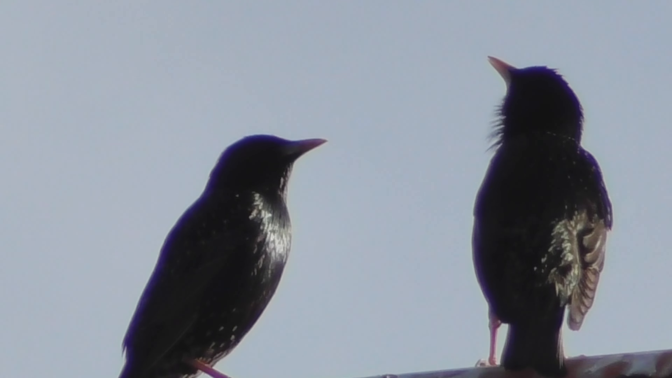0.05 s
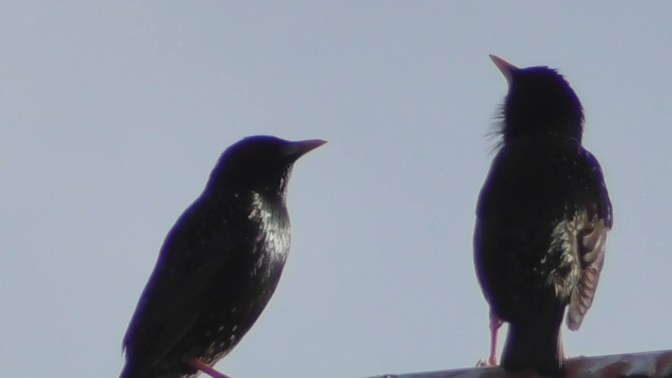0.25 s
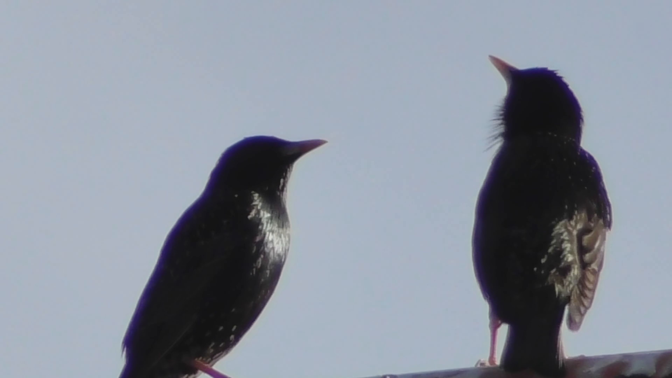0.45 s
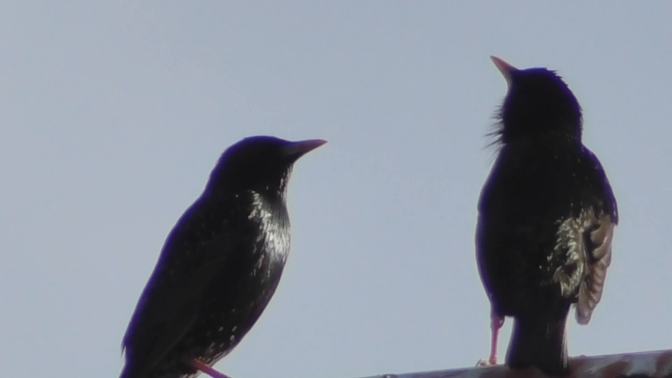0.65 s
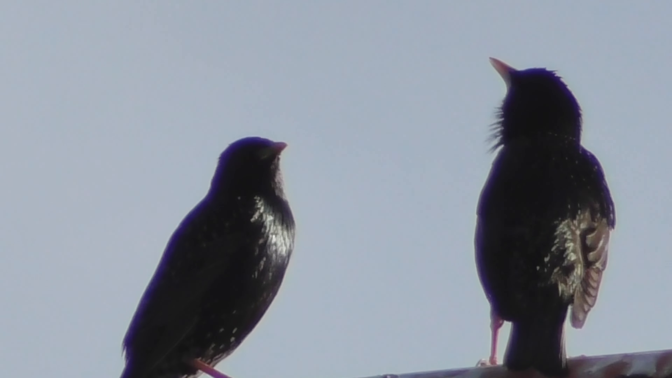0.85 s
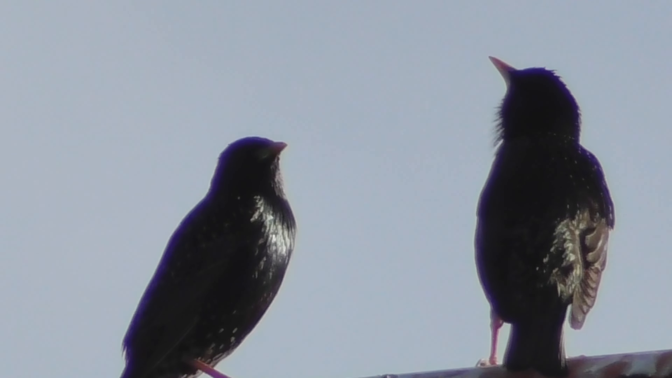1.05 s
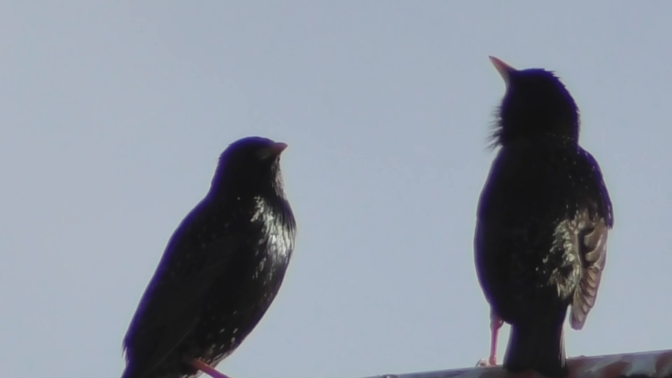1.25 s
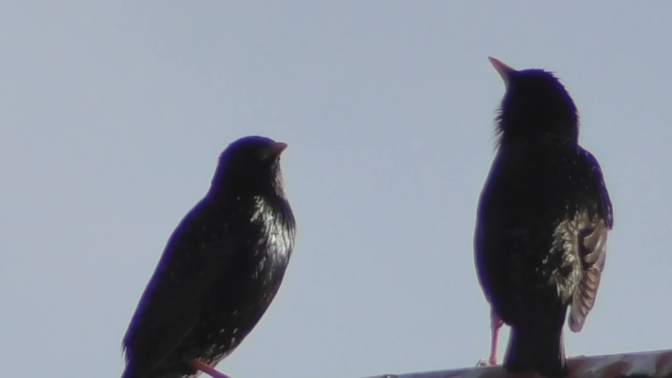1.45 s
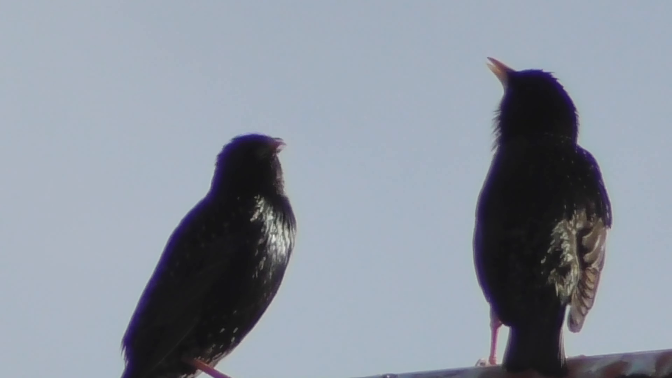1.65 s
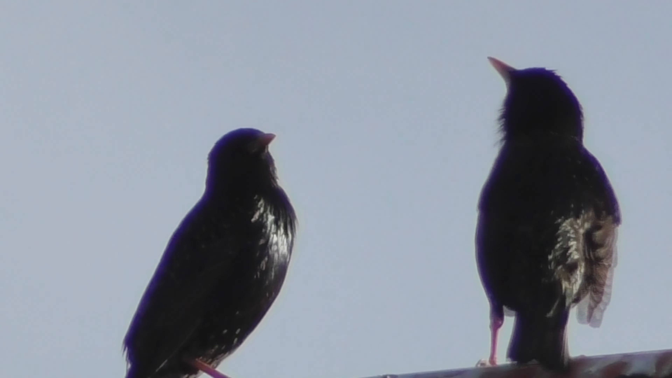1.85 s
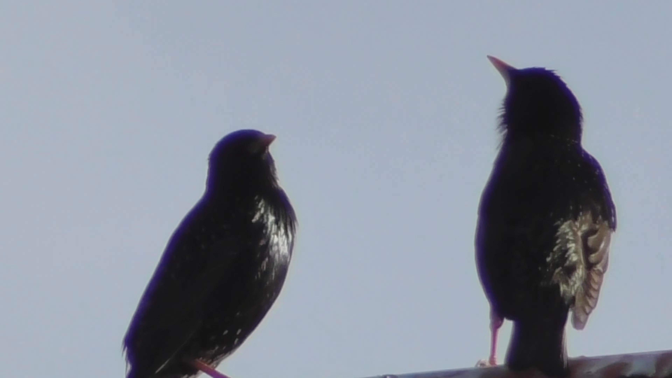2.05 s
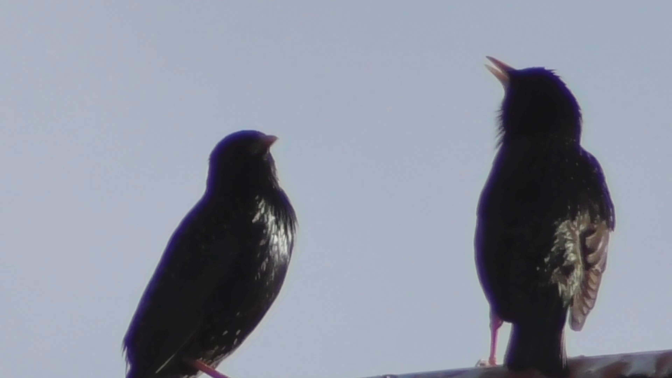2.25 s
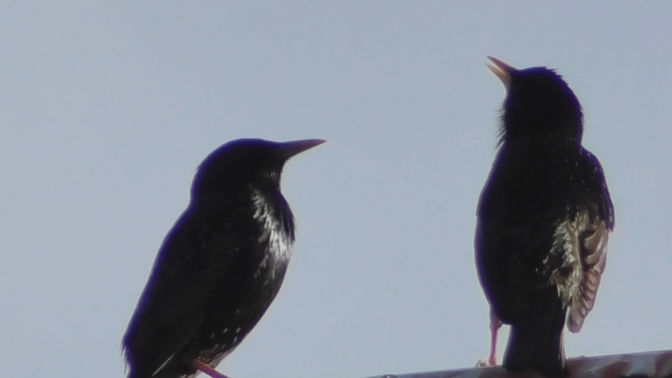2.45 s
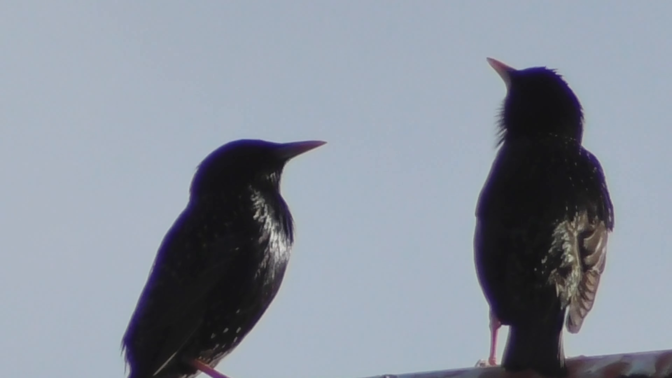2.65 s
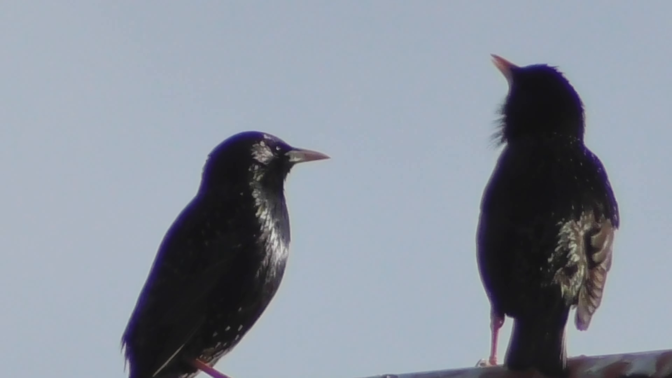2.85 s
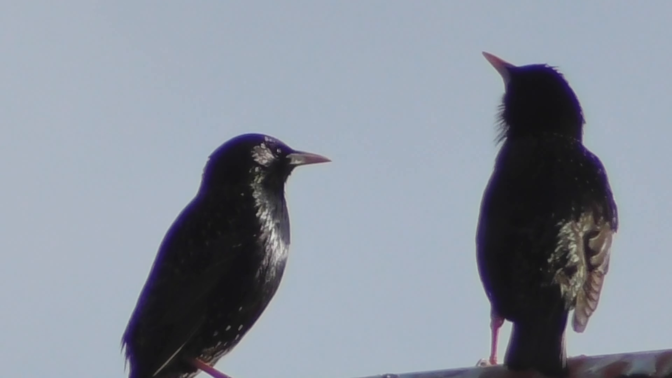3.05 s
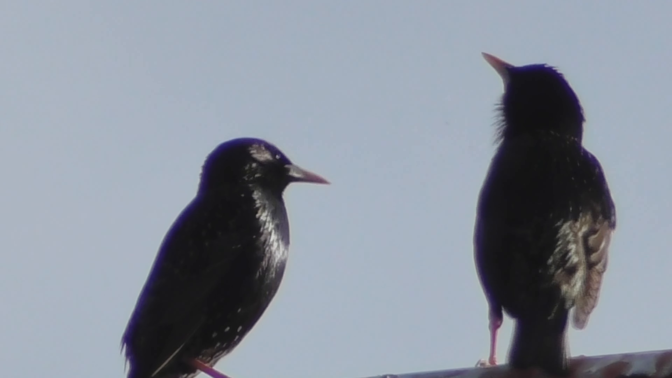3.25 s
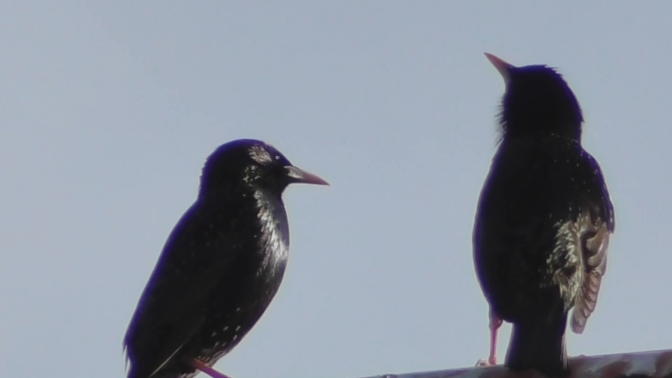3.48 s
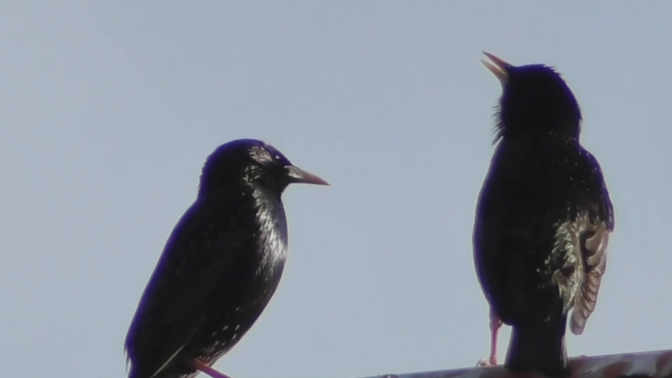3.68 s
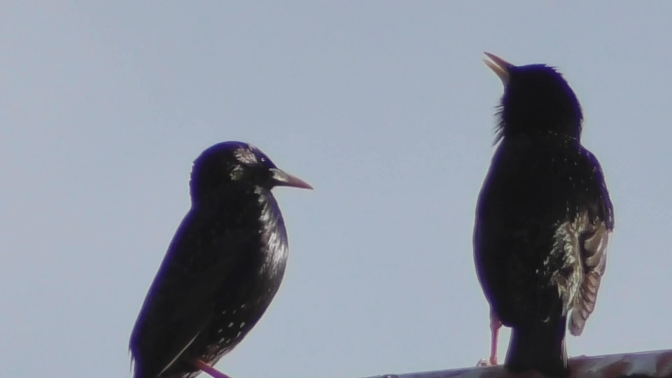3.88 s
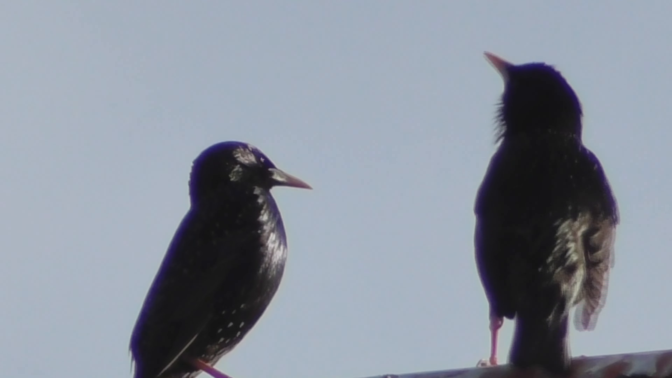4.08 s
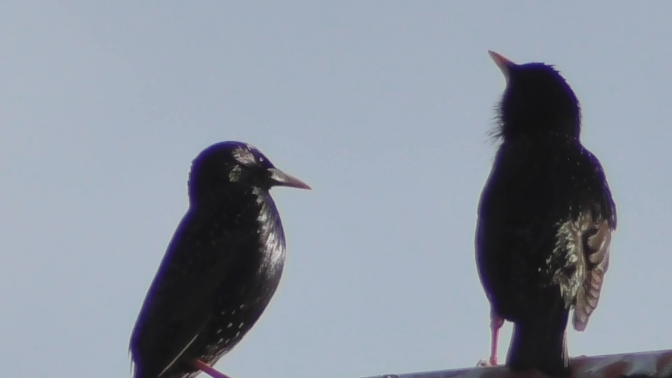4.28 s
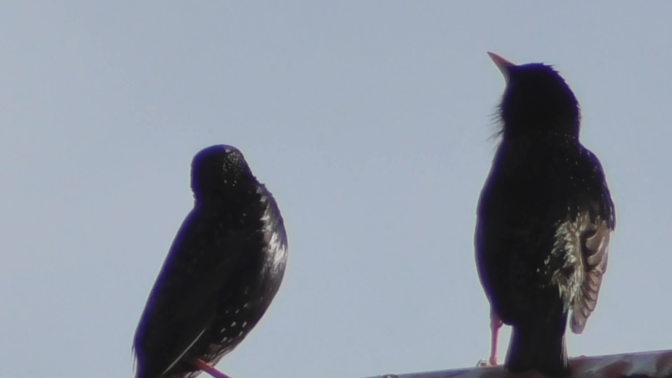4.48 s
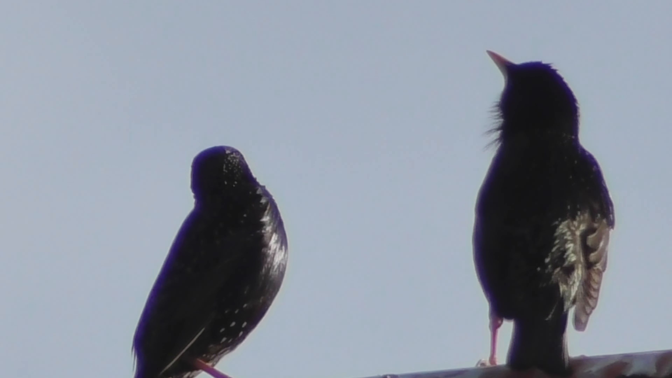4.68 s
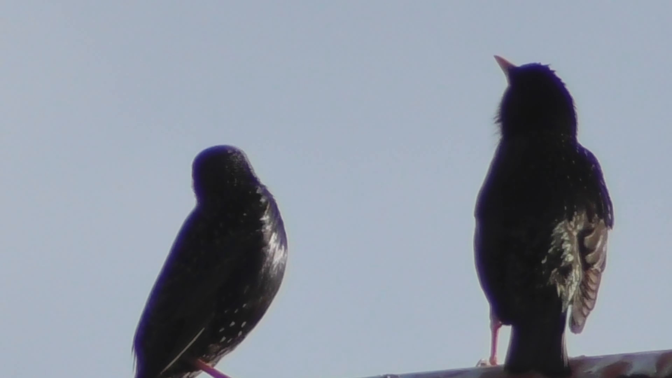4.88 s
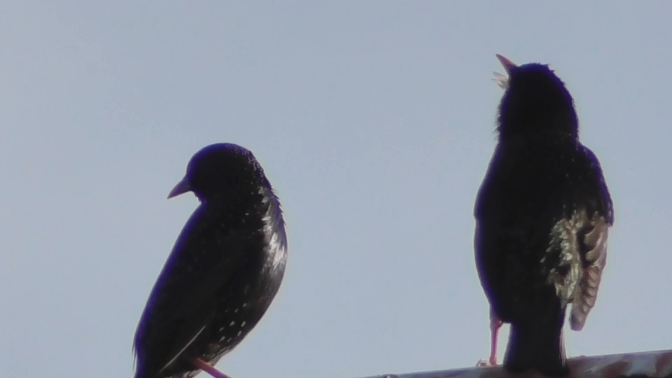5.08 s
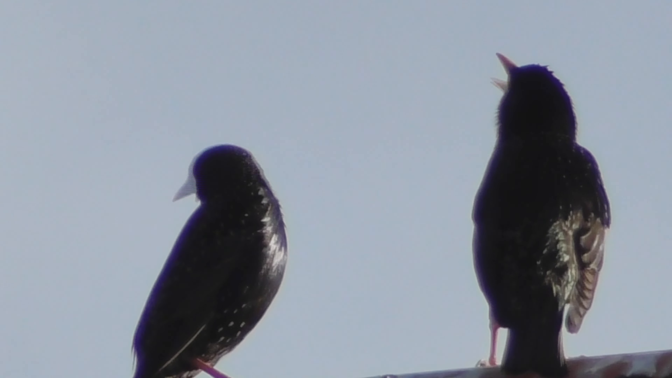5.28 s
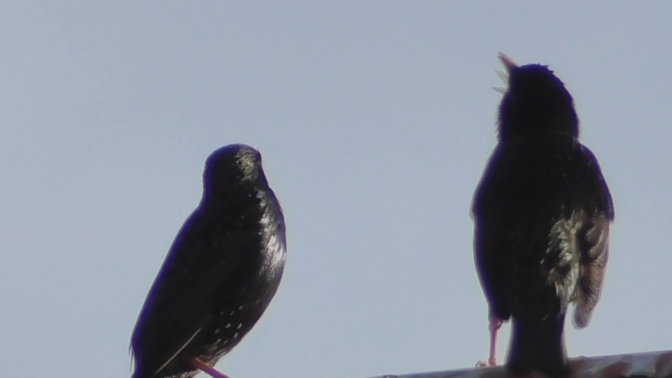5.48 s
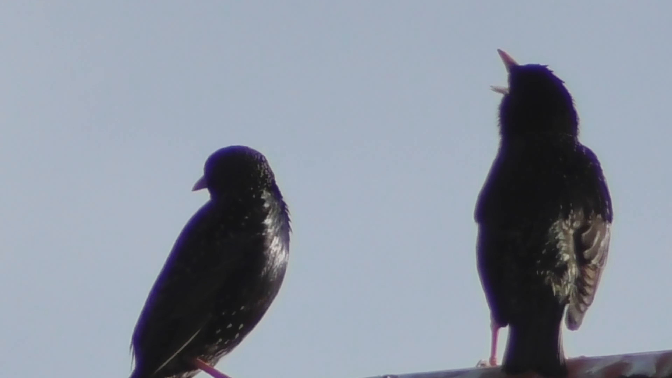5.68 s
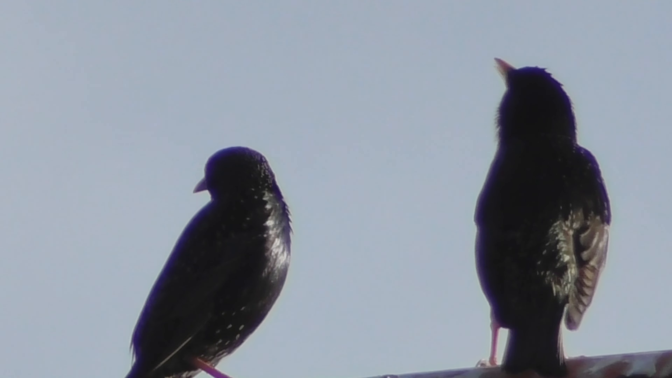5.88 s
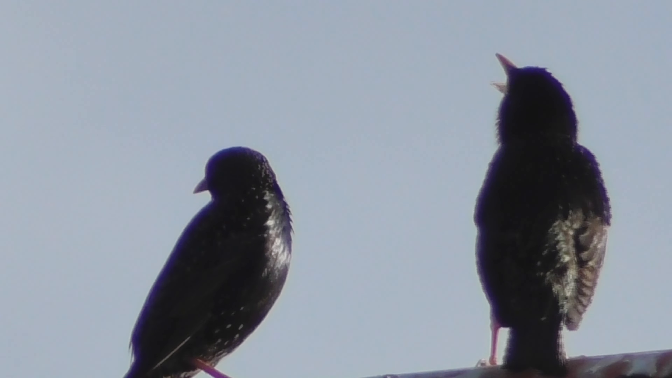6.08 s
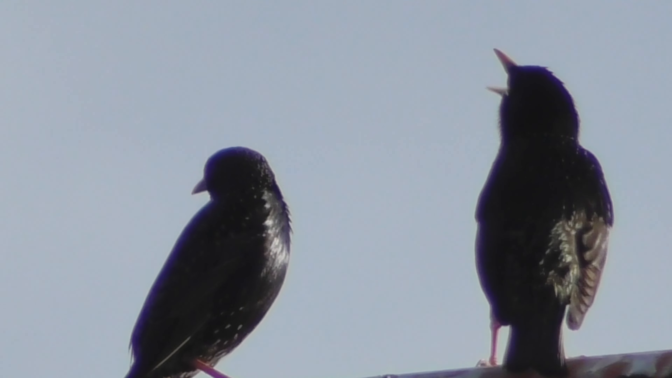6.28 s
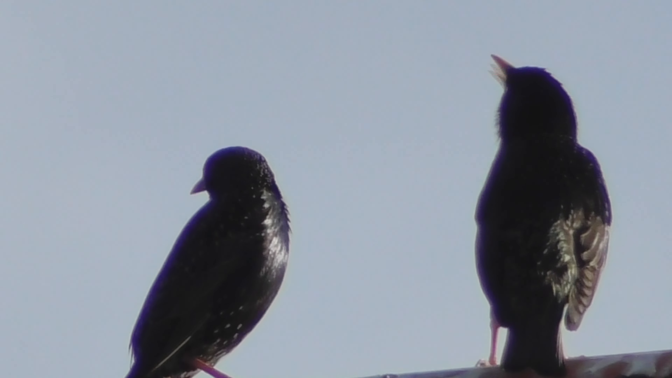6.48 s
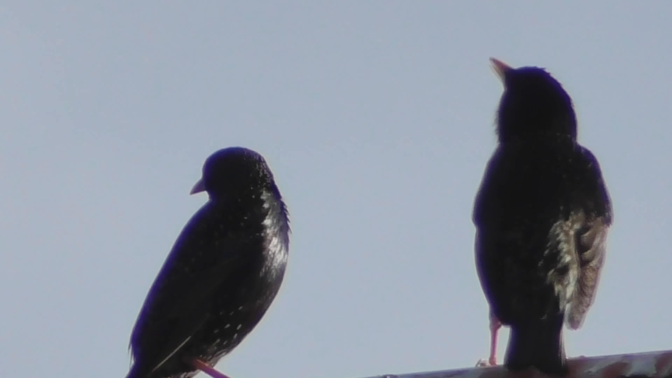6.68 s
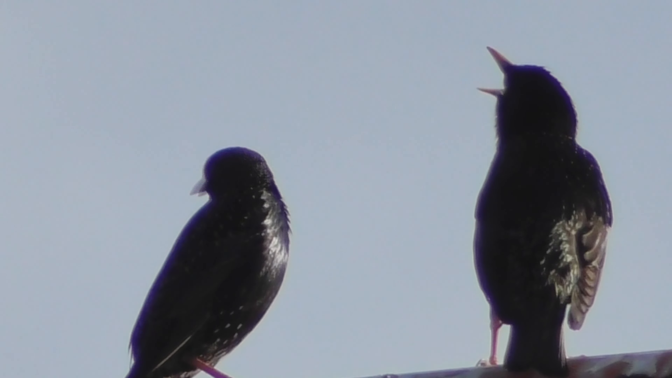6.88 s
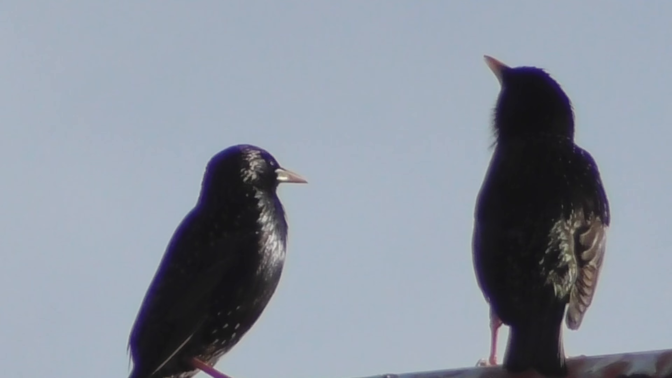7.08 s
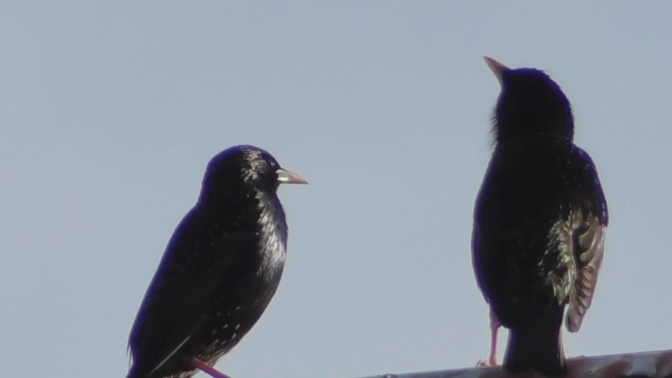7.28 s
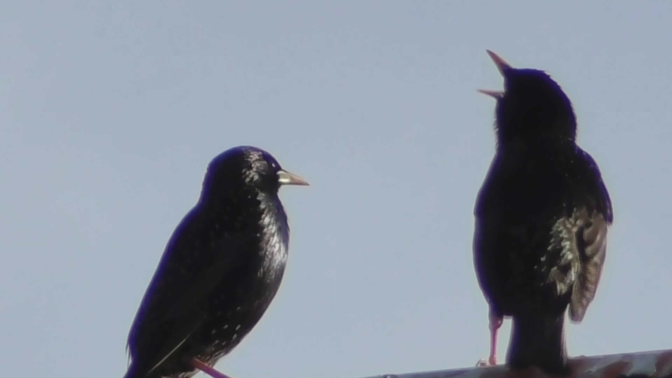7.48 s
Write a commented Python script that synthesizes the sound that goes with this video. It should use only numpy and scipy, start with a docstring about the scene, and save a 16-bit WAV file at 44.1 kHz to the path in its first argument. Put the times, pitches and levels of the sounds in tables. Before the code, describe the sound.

Hoarse sparrow chirps echo among houses as a close starling clicks and rasps quietly, then breaks into shrill, warbling whistles.

```python
"""A sparrow chirps among the houses as a rush of air swells, with a dull knock and the snap of a bill.
Near the microphone a starling sings on a roof: soft thin notes, clicks and rasps, then loud wavering
whistles near 8 kHz, toned by the membranes of its syrinx. Farther off the sparrows go on in two hoarse
voices and a distant bird gives three low clucks. The walls return every note over a faint rumble."""
import sys
import numpy as np
from scipy import signal
from scipy.fft import rfft, irfft, next_fast_len
from scipy.io import wavfile
from scipy.ndimage import uniform_filter1d

SR = 44100
rng = np.random.default_rng(int(sys.argv[2]) if len(sys.argv) > 2 else 0)


def unload_audio(sound):
    """Save the sound as a 16-bit wav file, at the path given as the first command line argument."""
    columns = np.transpose(np.atleast_2d(sound))
    # keep every value between -1 and 1, then stretch to whole-number steps
    steps = np.round(np.clip(columns, -1, 1) * 32767)
    wavfile.write(sys.argv[1], SR, steps.astype(np.int16))


N = 332073
TIME = np.arange(N) / SR


def from_db(db):
    """Decibels to gain."""
    return 10 ** (np.asarray(db) / 20)


def rms_one(x):
    """Scale to unit power."""
    return x / np.sqrt(np.mean(x ** 2) + 1e-20)


def add(track, s, sound):
    """Mix a sound into a track, s seconds in."""
    start = int(np.clip(round(s * SR), 0, N))
    track[start:start + len(sound)] += sound[:N - start]


def at_hz(points, size):
    """A (frequency, value) curve read on the frequency grid of a sound of this size."""
    hz, value = np.transpose(points)
    return np.interp(np.log(np.fft.rfftfreq(size, 1 / SR) + 1), np.log(hz), value)


def coloured(x, colour):
    """Pass a sound through a (frequency [Hz], gain [dB]) response."""
    size = next_fast_len(N + SR // 10)
    return irfft(rfft(x, size) * from_db(at_hz(colour, size)), size)[:N]


def noise(colour):
    """Mono noise of a given colour, at unit power."""
    return rms_one(coloured(rng.standard_normal(N), colour))


def waver(size, per_s):
    """Random unsteadiness of spread about 1."""
    return np.interp(np.arange(size) * min(per_s / SR, 1), np.arange(size + 1), rng.standard_normal(size + 1))


# how alike the air is at the two microphones: (frequency [Hz], left-right correlation [-1..1])
LIKENESS = [(30, -0.41), (150, -0.14), (400, 0.024), (900, -0.42), (2000, 0.68), (4000, 0.99),
            (15000, 0.98)]
def wide_noise(colour):
    """Noise from all around, alike at both microphones only in the treble."""
    size = next_fast_len(N)
    mid, side = rfft(rng.standard_normal((2, size))) * from_db(at_hz(colour, size))
    alike = np.clip(at_hz(LIKENESS, size), -.99, .99)
    pair = irfft(np.sqrt(1 + alike) * mid + np.sqrt(1 - alike) * side * [[1], [-1]], size)[:, :N]
    return pair / np.std(pair.mean(axis=0))


# rise and fall of the outdoor air: (time [s], rumble and rush gain [dB], hiss gain [dB])
AIR = [(0.0, -67, -70), (0.36, -69.5, -69), (0.69, -67.5, -75.5), (1.26, -68.5, -75.5), (1.49, -70, -77.5),
       (1.72, -71.5, -78), (1.91, -68.5, -74.5), (2.2, -67, -73), (2.56, -71, -77), (3.8, -71.5, -77),
       (4.26, -68, -74), (4.86, -73, -77.5), (5.56, -69.5, -72.5), (6.56, -69, -71.5), (6.8, -66, -75.5),
       (7.07, -67, -74), (7.34, -69.5, -75.5), (7.53, -71, -78.5)]
# spectra of its three layers: (frequency [Hz], relative density [dB])
RUMBLE = [(25, -6), (60, -3.5), (110, 1), (200, -2), (300, -3), (450, -6), (700, -12), (1000, -29),
          (1600, -52)]
RUSH = [(150, -39), (280, -3.5), (450, 2.5), (800, -1.5), (1050, -3.5), (1300, -9.5), (1600, -22),
        (2200, -15.5), (3000, -28.5)]
HISS = [(1200, -20), (1600, -10.5), (2300, -1.5), (2800, -6.5), (3400, 2.5), (4000, 6), (5000, -11),
        (6300, -0.5), (7400, 2.5), (9000, 4), (12000, 3), (16000, 2)]
def air():
    """The bed of the place: far rumble with a soft rush above it, and an even hiss."""
    s, *levels = np.transpose(AIR)
    far_gain, hiss_gain = [from_db(np.interp(TIME, s, db)) for db in levels]
    far = from_db(2) * wide_noise(RUMBLE) + from_db(-2) * wide_noise(RUSH)
    return far_gain * far + hiss_gain * from_db(6) * wide_noise(HISS)


def swell(start_s=.01, attack_s=.19, hold_s=.21, t60_s=1.0, level_db=-56):
    """A rush of air from straight ahead grows, holds and dies away."""
    attack = np.clip((TIME - start_s) / attack_s, 0, 1)
    released_s = np.maximum(TIME - start_s - attack_s - hold_s, 0)
    return attack * from_db(level_db - 60 * released_s / t60_s) * noise(RUSH)


# faint steady whines in the background: (frequency [Hz], width [Hz], level [dB])
WHINES = [(297.6, 12, -73.5), (374.7, 14, -78), (2178, 140, -91), (5570, 160, -90.5), (7940, 230, -93)]
def whines():
    """Narrow bands of noise hang in the air; only the high ones are alike at both microphones."""
    out = np.zeros((2, N))
    for hz, width_hz, db in WHINES:
        alike = np.interp(hz, *np.transpose(LIKENESS))
        carrier = np.exp(2j * np.pi * hz * TIME)
        mid, side = [((waver(N, width_hz) + 1j * waver(N, width_hz)) * carrier).real for _ in range(2)]
        out += from_db(db) * (np.sqrt(1 + alike) * mid + np.sqrt(1 - alike) * side * [[1], [-1]])
    return out


# a soft dull knock near the microphone: (time [s], level [dB])
KNOCKS = [(.310, -41)]
# its resonances: (frequency [Hz], relative level [dB], time to fall 60 dB [s])
KNOCK_MODES = [(514, 2.5, .02), (900, -4, .015)]
def knock():
    """The knock rings two quickly damped modes."""
    t = TIME[:SR // 10]
    ring = sum(from_db(db - 60 * t / t60) * np.sin(2 * np.pi * hz * t) for hz, db, t60 in KNOCK_MODES)
    out = np.zeros(N)
    for s, db in KNOCKS:
        add(out, s, from_db(db) * ring)
    return out


def houses(x, first_s, build_s, t60, late_db, late_t60, width):
    """Roofs and walls scatter a sound back to the microphone: a dense early cloud, a faint long tail."""
    t = np.maximum(TIME[:SR] - first_s, 0)
    decay = from_db(-60 * t / t60) + from_db(late_db - 60 * t / late_t60)
    fade = (1 - np.exp(-t / build_s)) * decay
    mid, side = rng.standard_normal((2, SR)) * fade / np.sqrt(np.sum(fade ** 2))
    return signal.fftconvolve(x[None], mid + width * side * [[1], [-1]], axes=1)[:, :N]


def flutter(size, width_hz=675):
    """Fast band-limited tremor of a bird's membranes, spread 1."""
    lowpass = signal.butter(6, width_hz, fs=SR, output="sos")
    return rms_one(signal.sosfilt(lowpass, rng.standard_normal(size + SR // 50))[-size:])


def syrinx(gesture, jitter, shimmer_db, waver_per_s, harmonics=((1, 0),), hoarse=0):
    """An unsteady membrane tone along (time [s], pitch [Hz], level [dB]); hoarseness breaks it up."""
    s, hz, db = np.transpose(gesture)
    s = np.maximum.accumulate(s - s[0])
    t = np.arange(max(int(s[-1] * SR), 200)) / SR
    pitch = uniform_filter1d(np.interp(t, s, hz), size=180) * (1 + jitter * waver(len(t), waver_per_s))
    level = from_db(np.interp(t, s, db) + shimmer_db * waver(len(t), waver_per_s))
    level *= (1 + hoarse * flutter(len(t))) / np.sqrt(1 + hoarse ** 2)
    edges = np.clip(np.minimum(t, t[-1] - t) / .00035, 0, 1)
    phase = 2 * np.pi * np.cumsum(pitch) / SR
    tone = sum(from_db(partial_db) * np.sin(k * phase) for k, partial_db in harmonics)
    return np.sqrt(2) * level * edges * tone


# clucks from far off: (time [s], level [dB])
CLUCKS = [(2.04, -66.5), (3.475, -66.5), (4.855, -68.5)]
# one cluck: (time into it [s], pitch [Hz], relative level [dB])
CLUCK = [(0, 1368, -2), (.01, 1426, -13), (.017, 1114, 5.5), (.028, 1115, 3), (.036, 1354, -13),
         (.046, 1070, 7.5), (.056, 1200, -32)]
def distant_bird():
    """Low rough clucks reach the microphone with a short echo."""
    clucks = np.zeros(N)
    for s, db in CLUCKS:
        cluck = syrinx(CLUCK, jitter=.095, shimmer_db=3.5, waver_per_s=559, hoarse=.43)
        add(clucks, s, from_db(db) * cluck)
    echoes = houses(clucks, first_s=.0016, build_s=.0031, t60=.15, late_db=-16, late_t60=.6, width=.23)
    return clucks + from_db(-5) * echoes


# a sparrow's lower voice: (time into the syllable [s], pitch [Hz], relative level [dB])
CHIRP = [(0, 4300, -14), (.012, 4810, -7), (.03, 4310, -12.5), (.048, 3790, 0), (.078, 3820, -17),
         (.086, 3674, -3.5), (.098, 3836, 1.5), (.11, 3260, -7.5), (.122, 2580, -11)]
CHIP = [(0, 4270, -5), (.02, 4900, -12), (.03, 4218, 2.5), (.05, 3650, -6.5), (.063, 3850, 3),
        (.08, 3326, -6), (.09, 3206, -6.5), (.105, 2440, -25)]
CHEEP = [(0, 2404, -27), (.028, 2900, -24), (.043, 3426, -2), (.058, 3768, -2), (.069, 3200, -6),
         (.077, 2560, -20), (.1, 3350, -6), (.116, 3010, -5.5), (.14, 2430, -13.5)]
CHIRRUP = [(0, 3913, -5), (.014, 4350, -2.5), (.022, 3430, -1.5), (.034, 3190, -4), (.044, 3633, -8),
           (.052, 3056, -6.5), (.072, 3406, -0.5), (.085, 3000, 1.5), (.11, 2230, -11.5)]
# the upper voice, from the other side of the syrinx, sets in first: same columns
CHIRP_UPPER = [(-.028, 3580, -24), (-.012, 4000, -20), (-.002, 5940, -19.5), (.02, 5500, -19.5),
               (0.032, 5500, -17), (0.061, 5200, -25), (0.095, 5550, -16), (.115, 4900, -44)]
CHEEP_UPPER = [(-.012, 4090, -26), (.004, 4900, -28), (0.018, 5200, -23), (.035, 5420, -13.5),
               (.06, 5200, -42), (.1, 5010, -34)]
CHIRRUP_UPPER = [(-.025, 4600, -24), (-.01, 5530, -10), (.01, 4890, -28), (.04, 4300, -22),
                 (0.071, 4110, -7)]
# syllables by name: (lower voice, upper voice, hoarseness [0-1])
SYLLABLES = {"chirp": (CHIRP, CHIRP_UPPER, 0.642), "chip": (CHIP, CHIRP_UPPER, 0.53),
             "cheep": (CHEEP, CHEEP_UPPER, 0.38), "chirrup": (CHIRRUP, CHIRRUP_UPPER, 0.32)}
# response of the throat: (frequency [Hz], gain [dB])
SPARROW_THROAT = [(1700, -10.5), (2400, -1.5), (3000, -1), (3700, 1.5), (4600, -1), (5400, -1),
                  (6200, -5.5), (7500, 9.5), (10500, 7.5), (14000, -15)]
# calls among the houses: (time [s], syllable, level [dB], stretch [x], pitch [x], echo gain [dB])
SPARROW_CALLS = [(.037, "chirp", -44, 0.99, 1.015, 1), (.874, "cheep", -45.5, 0.88, 1.013, 0.5),
                 (1.792, "chirrup", -61, 0.91, 0.99, 2), (1.878, "chip", -47.5, 1.02, 0.98, 2),
                 (2.105, "chirrup", -58.5, 1.4, 1.047, 6), (2.49, "chip", -72.5, 0.82, 0.98, 2),
                 (2.835, "cheep", -45.5, 0.96, 1.012, 0), (3.272, "chirrup", -61.5, 0.88, 1.016, 1.5),
                 (3.976, "chirp", -45.5, 1.0, 1.014, 1), (5.025, "chirrup", -60, 0.93, 1.01, -2),
                 (5.541, "cheep", -43.5, 0.93, 0.99, -1.5), (6.02, "chip", -57, 1.6, 0.89, 4),
                 (6.424, "chip", -45, 1.044, 0.99, 3), (7.15, "chirrup", -71.5, 0.87, 0.98, -4)]
def sparrows(upper_hoarse=.836):
    """Hoarse two-voiced chirps, far enough off to arrive with about as much echo as direct sound."""
    direct, scattered = np.zeros((2, N))
    for s, name, db, stretch, pitch, echo_db in SPARROW_CALLS:
        lower, upper, lower_hoarse = SYLLABLES[name]
        for voice, hoarse in (lower, lower_hoarse), (upper, upper_hoarse):
            gesture = np.array(voice) * [stretch, pitch, 1] + [0, 0, db]
            call = syrinx(gesture, jitter=.0452 * hoarse, shimmer_db=2.5, waver_per_s=500,
                          harmonics=[(1, -.5), (2, -33), (3, -29)], hoarse=hoarse)
            onset_s = s + gesture[0, 0]
            add(direct, onset_s, call)
            add(scattered, onset_s, call * from_db(echo_db))
    echoes = houses(coloured(scattered, SPARROW_THROAT),
                    first_s=.00097, build_s=.012, t60=.42, late_db=-24.5, late_t60=1.8, width=.15)
    return coloured(direct, SPARROW_THROAT) + echoes


# the starling's bill clicks, close by: (time [s], level [dB])
CLICKS = [(.327, -40), (1.397, -51.5), (5.459, -53), (5.609, -45), (6.259, -44), (6.8331, -47)]
# its throat rasps: (time [s], length [s], level [dB])
RASPS = [(0.45, 0.044, -63.5), (0.515, 0.037, -60.5), (0.629, 0.021, -66.5), (1.27, 0.075, -68.5),
         (1.347, 0.026, -64.5), (1.429, 0.037, -68), (2.958, 0.025, -65), (3.005, 0.022, -67),
         (4.01, .12, -66), (4.272, .051, -65.5), (4.331, 0.063, -65), (5.885, 0.051, -70),
         (7.32, 0.061, -73)]
# their spectra: (frequency [Hz], relative level [dB])
CLICK_COLOUR = [(500, -33), (1500, -14), (2500, 1.5), (4000, -9), (6500, 14.5), (9000, 4), (11000, -26),
                (16000, -28)]
RASP_COLOUR = [(4000, -7.5), (6300, -15), (7500, 4), (8600, -3), (10000, -19), (14000, -36)]
def starling_clicks_and_rasps(click_t60_s=.0049, pulse_hz=170, pulse_depth=.49):
    """Sharp snaps of the bill, and short rasps of pulsed hiss from the throat."""
    snaps, rasps = np.zeros((2, N))
    for s, db in CLICKS:
        add(snaps, s, from_db(db - 60 * TIME[:SR // 20] / click_t60_s))
    for s, length, db in RASPS:
        t = TIME[:int(length * SR)]
        pulses = 1 + pulse_depth * np.sin(2 * np.pi * pulse_hz * t)
        add(rasps, s, from_db(db) * np.sqrt(np.hanning(len(t))) * pulses)
    return snaps * noise(CLICK_COLOUR) + rasps * noise(RASP_COLOUR)


def arch(length, start_hz, end_hz, db, ends_db=-5):
    """The gesture of a simple glide, strongest in the middle."""
    middle_hz = (start_hz + end_hz) / 2
    return [(0, start_hz, db + ends_db), (length / 2, middle_hz, db), (length, end_hz, db + ends_db)]


def murmurs(count=5, span_s=(1, 5.4), length_s=.073, centre_hz=7100, spread_hz=500, glide_hz=302, db=-76):
    """Faint glides at random times and pitches, as rows like those of the soft notes."""
    times = rng.uniform(*span_s, count)
    pitches = rng.normal(centre_hz, spread_hz, count)
    return [(s, length_s, hz, hz + rng.normal(0, glide_hz), db) for s, hz in zip(times, pitches)]


# quiet notes from the roof: (time [s], length [s], start pitch [Hz], end pitch [Hz], level [dB])
SOFT_NOTES = [(0.0, .038, 7350, 6900, -65), (.762, 0.057, 7500, 7050, -66.5),
              (0.808, .065, 7050, 6650, -73), (.955, .09, 7350, 6000, -75), (1.15, .055, 5900, 4750, -78),
              (3.04, .018, 7150, 5900, -78), (3.06, 0.1, 5830, 5860, -77), (3.819, 0.13, 7320, 7180, -84),
              (4.44, .11, 5700, 5800, -82), (4.504, .05, 8020, 8600, -77), (3.304, .03, 7600, 9200, -69.5),
              (3.39, 0.016, 8600, 6900, -70), (4.17, .046, 7700, 8180, -73.5),
              (4.24, .054, 7150, 7600, -72), (4.422, .047, 7600, 7450, -69), (4.571, 0.05, 7950, 7720, -72),
              (4.671, 0.025, 7000, 8350, -70), (4.667, 0.028, 3130, 3630, -71.5),
              (4.764, .015, 5500, 3620, -74), (4.767, .021, 7780, 7640, -72),
              (5.905, 0.017, 4380, 6200, -54), (5.908, 0.027, 4150, 4090, -55.5),
              (7.164, 0.015, 3950, 4300, -74), (7.293, .027, 3220, 3480, -70.5),
              (7.418, .024, 3700, 3450, -73.5)]
NASAL_NOTES = [(5.882, .045, 1186, 1390, -55.5), (6.536, 0.027, 1163, 1370, -54.5)]
# partials of a nasal note: (multiple of the pitch [x], relative level [dB])
NASAL_HARMONICS = [(1, -9), (3, -7.5), (4, -10.5), (5, -6), (6, -11), (7, -5)]
def starling_soft_notes():
    """The syrinx slides through thin pure notes and two low nasal ones, rich in harmonics."""
    out = np.zeros(N)
    for s, *note in SOFT_NOTES + murmurs():
        add(out, s, syrinx(arch(*note), jitter=.005, shimmer_db=1.5, waver_per_s=540))
    for s, *note in NASAL_NOTES:
        add(out, s, syrinx(arch(*note), jitter=.026, shimmer_db=-.5, waver_per_s=511,
                           harmonics=NASAL_HARMONICS, hoarse=.1))
    return out


# the starling's held low whistle: (time [s], pitch [Hz], level [dB])
HELD_NOTE = [(5.158, 7400, -57.5), (5.175, 5470, -58), (5.185, 5550, -56), (5.249, 5690, -59),
             (5.319, 5730, -63), (5.469, 6000, -59), (5.54, 6000, -68)]
def starling_held_note():
    """One side of the syrinx holds a buzzy note with a faint octave."""
    note = syrinx(HELD_NOTE, jitter=.0111, shimmer_db=4, waver_per_s=440,
                  harmonics=[(1, -1.5), (2, -22)], hoarse=.072)
    out = np.zeros(N)
    add(out, HELD_NOTE[0][0], note)
    return out


def starling_trill(start_s=5.19, length_s=.2, centre_hz=8600, swing_hz=450, trill_hz=76, level_db=-63):
    """The other side trills above the held note; at each crest the two beat to a low tick."""
    t = TIME[:int(length_s * SR)]
    swing = np.sin(2 * np.pi * trill_hz * t)
    pitch = centre_hz + swing_hz * swing
    held_s, held_hz, _ = np.transpose(HELD_NOTE)
    beat_hz = pitch - np.interp(start_s + t, held_s, held_hz)
    trill, beat = np.sin(2 * np.pi * np.cumsum([pitch, beat_hz], axis=1) / SR)
    ticks = from_db(-3) * np.maximum(swing, 0) ** 2 * beat
    out = np.zeros(N)
    add(out, start_s, from_db(level_db) * np.sqrt(2 * np.hanning(len(t))) * (trill + ticks))
    return out


def glide(s, length, start_hz, end_hz, db, bend, best_hz=7660, loss_db_per_khz=4):
    """The gesture of a sweep that starts fast and flattens out, loudest at the voice's best pitch."""
    share = np.linspace(0, 1, 9)
    hz = end_hz + (start_hz - end_hz) * (1 - share) ** bend
    off_khz = np.abs(hz - best_hz) / 1000
    return list(zip(s + length * share, hz, db - loss_db_per_khz * off_khz))


# one wobble, a shelf then a crest: (share of its length [0-1], height above trough [Hz], gain [dB])
WOBBLE = [(0, 0, -0.5), (.2, 286, -6), (.48, 281, 0.5), (.76, 698.5, 1)]
def long_whistle(wobbles, trough_hz, db, top_hz=9370, climb_hz=100.5, end_hz=8610):
    """The gesture of a long whistle: dive to the trough, wobble a little higher each time, rise."""
    dive_s, first_wobble_s, wobble_s, rise_s = .042, .054, .0635, .053
    gesture = glide(0, dive_s, top_hz, trough_hz, db, bend=1.5)
    s = dive_s
    for k in range(wobbles):
        length = wobble_s if k else first_wobble_s
        gesture += [(s + share * length, trough_hz + hz, db + step_db) for share, hz, step_db in WOBBLE]
        s += length
        trough_hz += climb_hz
    return gesture + glide(s, rise_s, trough_hz, end_hz, db, bend=1.8)


# long whistles from the roof: (time [s], wobbles [count], first trough [Hz], level [dB])
WHISTLES = [(5.619, 2, 7010, -32.5), (6.268, 2, 7150, -32.5), (6.841, 3, 7090, -33.5)]
# short dives that fade as they fall: (time [s], level [dB])
DIVES = [(5.316, -37.5), (6.011, -39)]
# one dive: (time into it [s], pitch [Hz], relative level [dB])
DIVE = [(0, 9100, -4.5), (.006, 8300, 1), (0.013, 7660, 0.5), (.023, 6620, -17.5), (.037, 6180, -23)]
# a soft low whistle that leaps into a loud hook: (time [s], pitch [Hz], level [dB])
HOOK = [(6.048, 6500, -69), (6.09, 6300, -57), (6.116, 6650, -52), (6.134, 8420, -34.5),
        (6.146, 8340, -35.5), (6.166, 7290, -38.5), (6.18, 8140, -46)]
def starling_whistles():
    """The loudest song at the microphone: the syrinx sweeps a nearly pure tone up and down."""
    gestures = [(s, long_whistle(*shape)) for s, *shape in WHISTLES]
    gestures += [(s, np.array(DIVE) + [0, 0, db]) for s, db in DIVES]
    gestures.append((HOOK[0][0], HOOK))
    out = np.zeros(N)
    for s, gesture in gestures:
        add(out, s, syrinx(gesture, jitter=.0056, shimmer_db=.5, waver_per_s=500, hoarse=.11))
    return out


def scene():
    """From among the houses: the starling near and a little to the right, other birds and air beyond."""
    song = starling_whistles() + starling_held_note() + starling_trill()
    song += starling_soft_notes() + starling_clicks_and_rasps()
    echoes = houses(song, first_s=.0067, build_s=.017, t60=.46, late_db=-47, late_t60=1.2, width=.065)
    pan = from_db([[-.23], [.23]])
    starling = pan * (song + from_db(-11) * echoes)
    return starling + distant_bird() + sparrows() + air() + swell() + whines() + knock()


def width_control(x, neutral_db=-56.5, db_per_db=.26, window_s=.03):
    """The recorder's gain on the side channel: narrow in quiet moments, wide under loud song."""
    mid, side = (x[0] + x[1]) / 2, (x[0] - x[1]) / 2
    power = np.abs(uniform_filter1d(mid ** 2, int(window_s * SR)))
    level_db = 10 * np.log10(power + 1e-12)
    return mid + side * from_db(db_per_db * (level_db - neutral_db)) * [[1], [-1]]


def record(dry):
    """Behind the microphones, the stereo width follows the level and the top is cut steeply."""
    cutoff_hz, edge_hz = 15900, 100
    size = next_fast_len(N + SR // 10)
    passband = np.clip((cutoff_hz - np.fft.rfftfreq(size, 1 / SR)) / edge_hz + .5, 0, 1)
    return irfft(rfft(width_control(dry), size) * passband, size)[:, :N]


dry = scene()
out = record(dry)
unload_audio(out)
```